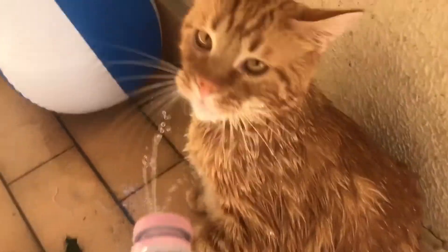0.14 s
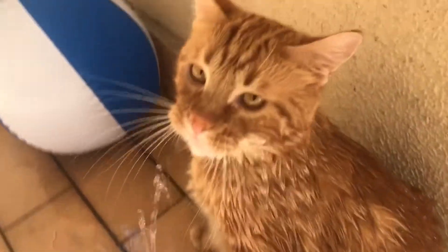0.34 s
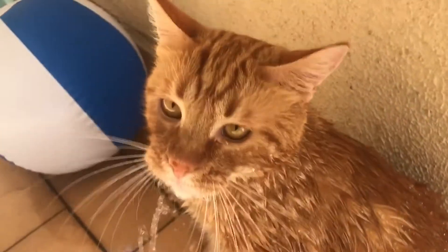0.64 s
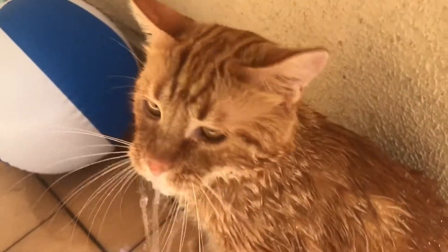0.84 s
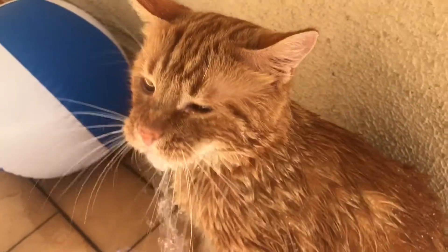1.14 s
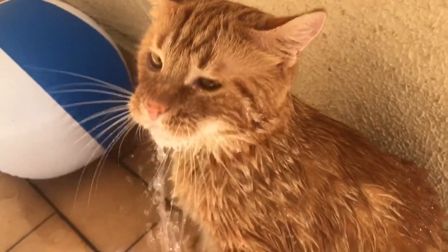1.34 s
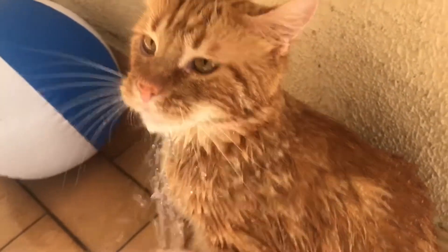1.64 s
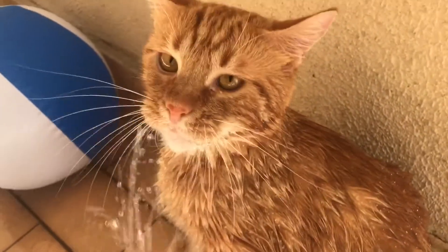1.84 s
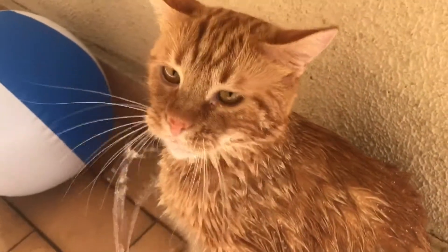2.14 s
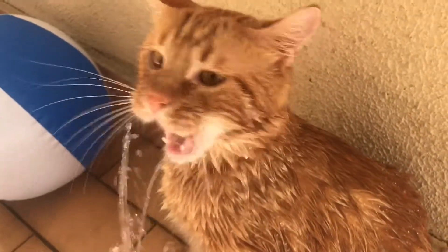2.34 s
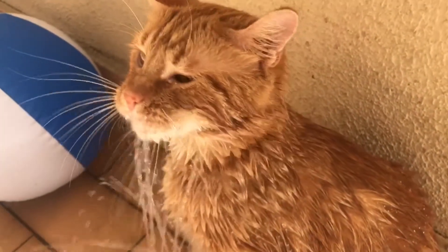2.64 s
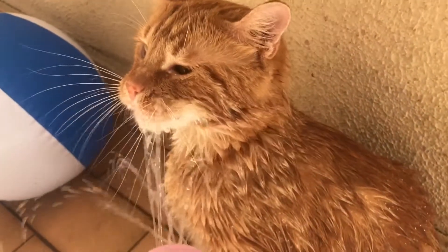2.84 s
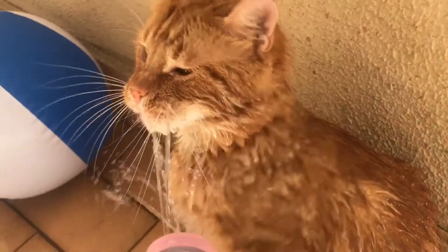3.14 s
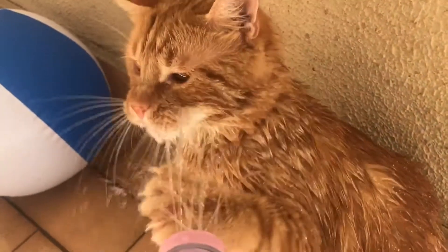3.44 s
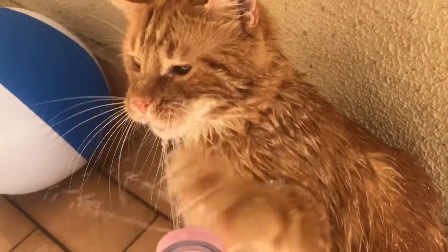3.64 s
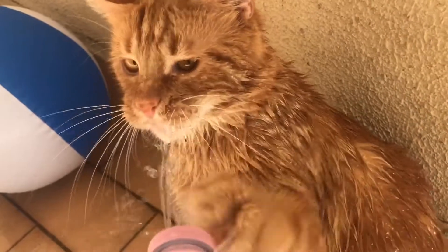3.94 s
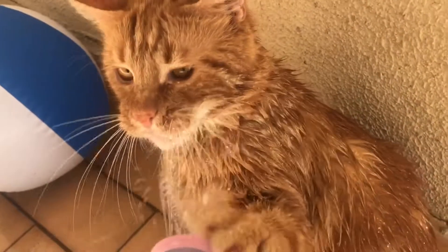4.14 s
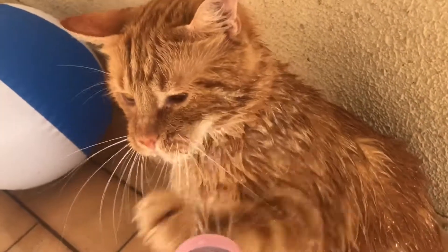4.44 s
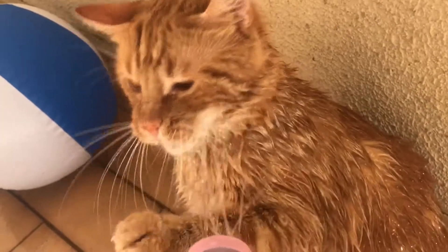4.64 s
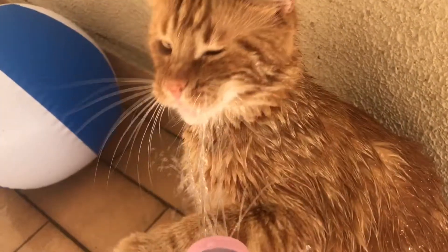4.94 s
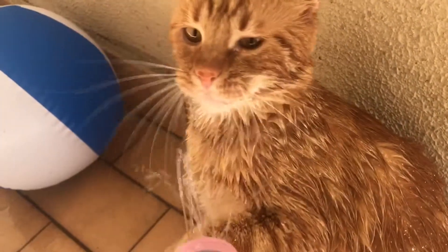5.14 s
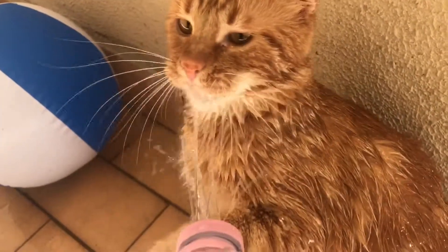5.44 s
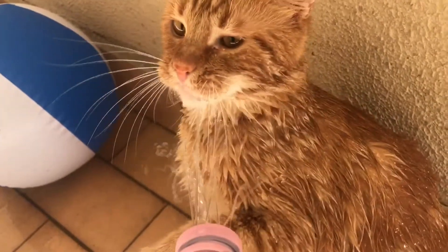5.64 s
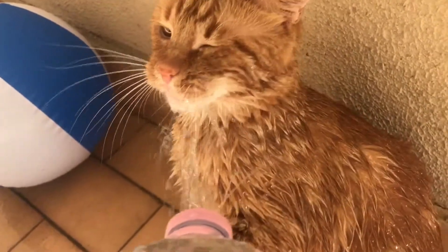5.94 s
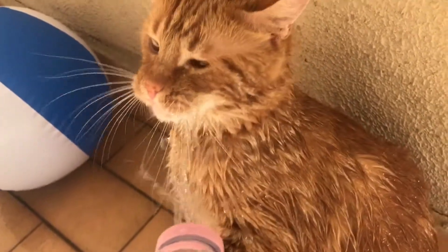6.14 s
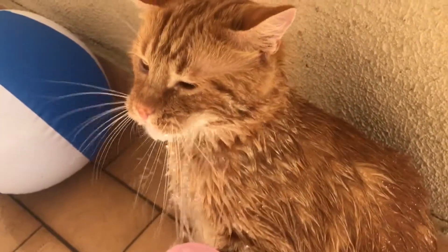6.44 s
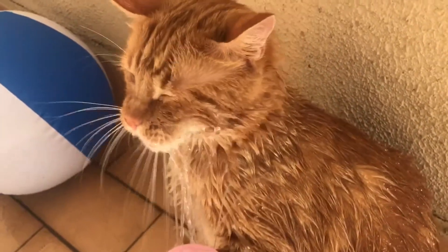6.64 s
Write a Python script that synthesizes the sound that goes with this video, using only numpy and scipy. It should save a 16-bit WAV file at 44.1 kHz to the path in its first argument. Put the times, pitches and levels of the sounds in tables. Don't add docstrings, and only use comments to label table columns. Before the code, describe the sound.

Close squeezed plastic bottle crackling and popping, the last pop loudest, with faint water hiss, droplet ticks and a short wall slap outdoors.

```python
import sys
import numpy as np
from scipy import signal
from scipy.fft import rfft, irfft, next_fast_len
from scipy.io import wavfile
from scipy.ndimage import uniform_filter1d, map_coordinates

SR = 44100
rng = np.random.default_rng(int(sys.argv[2]) if len(sys.argv) > 2 else 0)


def digitize_waveform(pressure):
    field = np.atleast_2d(pressure).T
    bounded = np.clip(field, -1, 1)
    quanta = np.round(bounded * 32767).astype(np.int16)
    wavfile.write(sys.argv[1], SR, quanta)


def boost(x):
    u = np.asarray(x, float) / 20
    return 10 ** u


N = 299880
FAINT_TOP_HZ = 15750


def unit(x):
    return x / np.sqrt(np.mean(x ** 2) + 1e-20)


def along(points, hz):
    f, v = np.transpose(points)
    return np.interp(np.log(hz + 1), np.log(f + 1), v)


def filtered(x, response):
    m = next_fast_len(len(x) + 8192)
    return irfft(rfft(x, m) * response(np.fft.rfftfreq(m, 1 / SR)), m)[:len(x)]


def resonances(modes):
    def response(f):
        total = 0
        for k, (hz, width, db) in enumerate(modes):
            total = total + (-1) ** k * boost(db) * 1j * f * width / (hz * hz - f * f + 1j * f * width)
        return total
    return response


def noise(response):
    return unit(filtered(rng.standard_normal(N), response))


def wobble(rate):
    knots = rng.standard_normal(int(N * rate / SR) + 4)
    return map_coordinates(knots, [np.arange(N) * rate / SR])


def swell(start, db, rise, hold, fall):
    t = np.arange(N) / SR - start - rise
    slope = np.minimum(t / rise, (hold - t) / fall)
    return boost(db + 20 * np.minimum(slope, 0).clip(-6))


def scattered(sound, response):
    click = filtered(signal.unit_impulse(len(sound), 100), response)
    return click * np.linalg.norm(sound) / np.linalg.norm(click)


def pops():
    starts = [
        2.8699,
        4.1462,
        4.6406,
        6.1967,
    ]
    # peak in dB, crack in dB, crack t60 at 1 kHz in seconds, echo in dB,
    # echo tilt in dB per octave, wait before a mode sounds in cycles.
    strengths = [
        (-15.3, -6.5, 0.036, -1, -3.7, .3),
        (-21, -12, .025, 0, -9.5, .9),
        (-7.5, -6, 0.028, -7.5, -0.6, .9),
        (-.5, -4, 0.021, -6.5, -0.5, .6),
    ]
    # frequency in Hz, width in Hz, level in dB.
    shells = [
        [(844, 106, -0.5), (1365, 85, -10.5), (2060, 75, -14), (2560, 150, -13), (2960, 130, -15),
         (3450, 190, -14), (3700, 230, -16), (4440, 200, -16)],
        [(340, 90, -3), (655, 46, 6.5), (900, 70, 7), (1040, 80, 5), (1240, 90, 1), (1950, 81, -1.5),
         (2230, 52, -3), (2500, 140, -5), (3440, 140, -11), (4000, 220, -12)],
        [(300, 150, 6), (835, 90, 0), (1080, 100, 0), (1390, 260, 7), (1890, 110, -6), (2070, 100, -9),
         (2640, 200, 1), (3370, 110, -5), (4350, 210, -15), (5210, 110, -15), (5470, 120, -14),
         (6480, 270, -12), (6760, 800, -2)],
        [(387, 90, -3.5), (525, 45, -2), (840, 290, -4), (1147, 210, -2), (1343, 95, 2), (1760, 80, 1.5),
         (2106, 100, -4), (2500, 250, -7), (3260, 130, -14), (4020, 170, -9), (5400, 400, -30),
         (6300, 300, -23), (7170, 200, -15), (8820, 250, -20)],
    ]
    # frequency in Hz, level in dB per Hz.
    colours = [
        [(120, -56), (200, -33), (892, 0), (1700, -12), (4450, -10.5), (15300, -63), (16500, -52)],
        [(120, -43), (200, -20), (997, 7), (3430, -18.5), (4530, -32), (14500, -52), (16500, -68)],
        [(59, -28.5), (100, -8), (324, -4), (620, -11), (1380, 2.5), (4880, -11.5), (6730, -12.5), (16500, -35)],
        [(60, -42), (130, -4), (1340, -6), (3650, -14.5), (4000, -12), (4900, -16), (10000, -20.5),
         (12000, -31), (16500, -42.5)],
    ]
    # frequency in Hz, width in Hz,
    # level in dB under the peak, t60 in seconds.
    bodies = [
        [(493, 1400, -23, 0.066), (1200, 1300, -29, 0.063), (900, 1200, -43, .2)],
        [(300, 350, -20, 0.07), (850, 500, -10, 0.065), (700, 1000, -32, .2)],
        [(320, 220, -25, 0.14), (1300, 1100, -27, 0.07), (700, 1100, -40, .3)],
        [(300, 600, -24, 0.11), (1300, 900, -30, .1), (1500, 2000, -48, .4)],
    ]
    crest_db = 12
    near, sent = np.zeros(N), np.zeros(N)
    t = np.arange(SR // 3) / SR
    for start, strength, shell, colour, body in zip(starts, strengths, shells, colours, bodies):
        db, crack_db, t60, echo_db, tilt_db, late = strength
        pop = boost(crack_db) * unit(crack(colour, t60, t)) + unit(shell_ring(shell, late, t))
        pop *= boost(db - crest_db) / np.sqrt(np.mean(pop[:SR // 100] ** 2))
        echo = scattered(pop, lambda f: boost(along(colour, f) + tilt_db * np.log2(f / 1000 + .01)))
        at = round(start * SR)
        near[at:][:len(t)] += pop + boost(db) * after_ring(body, t)
        sent[at:][:len(t)] += 0.21 * pop + boost(echo_db) * echo
    return np.array([near, sent])


def crack(colour, t60, t):
    hz, u, z = signal.stft(rng.standard_normal(len(t)), SR, nperseg=64, noverlap=56)
    lasts = t60 * (1000 / (hz[:, None] + 300)) ** .6
    fall_db = 60 * np.maximum(u - .0008, 0) / lasts
    dying = boost(along(colour, hz)[:, None] - fall_db) / np.sqrt(lasts)
    share = np.linalg.norm(dying, axis=1, keepdims=True) / np.linalg.norm(z * dying, axis=1, keepdims=True)
    burst = signal.istft(z * share * dying, SR, nperseg=64, noverlap=56)[1][:len(t)]
    return filtered(burst, lambda f: (1j * f / (1j * f + 1500)) ** 2)


def shell_ring(modes, late, t):
    ring = np.zeros(len(t))
    for k, (hz, width, db) in enumerate(modes):
        ring += (-1) ** k * boost(db) * mode(hz, width, np.maximum(t - late / hz, 0))
    return ring


def mode(hz, width, t):
    swell_cycles = .6
    rise = 1 - np.exp(-(t * hz / swell_cycles) ** 2)
    return width * np.sin(2 * np.pi * hz * t) * np.exp(-np.pi * width * t) * rise


def after_ring(body, t):
    ragged_db = 3
    out = np.zeros(len(t))
    for hz, width, db, t60 in body:
        wave = resonances([(hz, width, 0)])
        ringing = unit(filtered(rng.standard_normal(len(t)), lambda f: wave(f) ** 2))
        out += boost(db - 60 * t / t60 + ragged_db * wobble(160)[:len(t)]) * ringing
    return out * (1 - np.exp(-t / .003))


def snaps(rows, echo_db, sharpness):
    faint_db, first_slip = -42.5, 3
    out, t = np.zeros((2, N)), np.arange(SR // 20) / SR
    for start, db, hz, t60, broad_db in rows:
        burst = rng.standard_normal(len(t)) * boost(-60 * t / t60) * (1 - np.exp(-t / .0001))
        burst[3] += first_slip * np.sign(burst[3])
        top_hz = FAINT_TOP_HZ if db < faint_db else SR
        patch = resonances([(hz, hz / sharpness, 0)])
        around = resonances([(hz, 1.17 * hz, 0)])
        snap = filtered(burst, lambda f: (patch(f) + boost(broad_db) * around(f)) * around(f) * (f < top_hz))
        snap *= boost(db + 1) / np.max(np.abs(snap))
        spread = resonances([(min(.95 * hz, 11000), .45 * hz, 0)])
        echo = boost(echo_db) * scattered(snap, lambda f: spread(f) ** 2)
        out[:, round(start * SR):][:, :len(t)] += [snap, echo]
    return out


def alike(rows, t60, broad_db):
    return [(*row, t60, broad_db) for row in rows]


def creases():
    # start in seconds, peak in dB, colour in Hz, t60 in seconds, broad share in dB.
    folds = [(0.5776, -36.5, 10600, .006, -16), (1.0328, -22.5, 6930, .0092, 2),
             (1.6751, -39, 8700, .008, -15), (1.9071, -47, 6340, .0088, -8),
             (2.5206, -29.5, 6900, .013, -19), (2.8734, -41, 6500, .0037, -20),
             (3.7968, -51, 6700, .016, -22), (3.8182, -29, 6700, .016, -16), (3.8748, -50, 12500, .008, -4),
             (4.791, -57, 6200, .016, -21), (5.1277, -48.5, 7640, .011, -22),
             (5.5533, -45, 8300, .018, -22), (6.5989, -44, 7980, .0098, -12)]
    return snaps(folds, echo_db=7, sharpness=8)


def clicks():
    # start in seconds, peak in dB, colour in Hz.
    crumples = [
        (2.878, -48, 13000),
        (3.0012, -33, 7600),
        (3.6082, -48, 11500),
        (3.6296, -54, 4740),
        (4.0415, -40, 8000),
        (4.1364, -44, 6200),
        (4.1604, -41, 14600),
        (4.1752, -39, 11000),
        (4.3215, -32, 11400),
        (5.3433, -54, 5700),
    ]
    return snaps(alike(crumples, t60=.01, broad_db=5), echo_db=2, sharpness=8)


def settling():
    # start in seconds, peak in dB, colour in Hz.
    ticks = [(0.051, -55, 10800), (0.9554, -63, 4620), (1.178, -56, 7150), (2.8904, -48, 4580),
             (2.9934, -40, 4900), (3.982, -52, 12000), (4.0113, -50, 12000), (2.5825, -51, 9500),
             (4.1755, -52, 5000), (4.196, -55, 4500), (4.2825, -55, 3600), (4.393, -53, 11000),
             (6.411, -52, 4500), (6.411, -46, 7700), (4.6455, -37, 5500), (4.6455, -36, 3400),
             (.157, -58, 10500), (.222, -58, 12000), (.291, -56, 9500), (2.322, -58, 11000),
             (4.0244, -50, 4600), (4.1449, -39, 6700), (4.1814, -51, 9360), (4.2228, -50.5, 8540),
             (4.2826, -36.5, 10350), (5.1098, -52, 13600), (5.893, -53, 6300), (5.9075, -48, 5900),
             (6.0621, -57, 5540), (6.1235, -51.5, 8400), (6.1479, -49, 6900), (6.4394, -52, 5780),
             (6.5176, -48, 8830)]
    return snaps(alike(ticks, t60=.008, broad_db=-9), echo_db=-2, sharpness=8)


def drops():
    # start in seconds, peak in dB, colour in Hz.
    hits = [(0.024, -50, 14000), (0.326, -58, 14000), (0.3381, -50, 15300), (0.3696, -53, 12500),
            (0.478, -54, 15000), (0.5406, -54, 14500), (1.2935, -52, 12600), (1.3548, -39, 14000),
            (1.6207, -45.5, 14200), (1.6447, -36, 14800), (2.0353, -42, 11000), (2.2358, -46, 14800),
            (2.573, -52, 12500), (2.592, -52, 13000), (3.87, -53, 13500), (2.9761, -47, 13300),
            (3.0235, -42.6, 14800), (3.1602, -47.5, 11500), (3.18, -48, 12500), (3.5264, -54, 11800),
            (4.3264, -46, 15000), (4.711, -47, 14000), (4.7666, -50, 14000), (5.228, -46.5, 13500),
            (5.244, -53, 13500), (5.338, -52, 15300), (5.375, -55, 12500), (2.738, -55, 14000),
            (3.154, -54, 15000), (3.298, -56, 13500), (5.4228, -42, 12900), (5.6341, -39.5, 13800),
            (5.8247, -33, 14600), (5.918, -49, 13000), (5.9554, -51.5, 14400), (6.411, -28, 13000),
            (6.4687, -51, 11260), (6.745, -53, 11500), (6.6822, -43.5, 14600)]
    return snaps(alike(hits, t60=.008, broad_db=-16), echo_db=-3, sharpness=7)


def squeaks():
    # start in seconds, peak in dB, colour in Hz.
    slips = [(2.55, -54, 2150), (2.5635, -54, 2000), (4.1645, -54, 2800), (3.9895, -55, 4350),
             (3.9973, -50, 4400), (4.0113, -46, 4350), (4.0312, -48, 4500), (4.0417, -43.5, 2970),
             (4.2228, -56, 2680), (4.235, -56, 2410), (4.2464, -54, 2630), (4.373, -55, 2140),
             (6.673, -54.5, 3300)]
    return snaps(alike(slips, t60=.023, broad_db=-29), echo_db=-2, sharpness=15)


def knocks():
    # start in seconds, peak in dB, colour in Hz, broad share in dB.
    touches = [(0.291, -52, 2420, -8), (4.013, -52, 1160, 0), (4.0235, -48, 1850, -10),
               (4.028, -48, 895, -6), (4.0322, -45, 1000, 4), (4.043, -35, 1300, -14),
               (4.044, -40, 300, -12), (4.051, -41, 1250, -14), (4.056, -43, 300, -4),
               (4.1452, -42, 2600, 3), (4.6272, -36, 1150, -10), (4.6295, -37, 330, -8),
               (4.514, -53, 900, 5), (4.6268, -41, 2500, -2), (5.8249, -45, 1500, 12),
               (6.6686, -42, 1110, -7.5)]
    rows = [(start, db, hz, .018, broad_db) for start, db, hz, broad_db in touches]
    return snaps(rows, echo_db=0.1, sharpness=5)


def drag():
    # peak in seconds, thud in dB, rustle in dB, then the times in seconds to rise and to fall 20 dB.
    clumps = [
        (4.002, -60, -68, .04, .04),
        (4.046, -39, -53, .06, .018),
        (4.162, -42, -57, .004, .03),
        (4.246, -53, -59, .06, .04),
        (4.3, -71, -66, .03, .2),
    ]
    # frequency in Hz, width in Hz, level in dB.
    thud_modes = [(288, 330, 3.5), (1310, 360, -5)]
    rustle_modes = [(2900, 760, 4.5), (4450, 450, 0.5), (8500, 2500, -4), (13000, 4000, -7)]
    thud = unit(boost(3.5 * wobble(80)) * noise(resonances(thud_modes)))
    rustle = unit(boost(6.5 * wobble(180)) * noise(resonances(rustle_modes)))
    out = np.zeros(N)
    for peak, thud_db, rustle_db, rise, fall in clumps:
        clump = boost(thud_db - 7) * thud + boost(rustle_db - 6.5) * rustle
        out += swell(peak - rise, 0, rise, 0, fall) * clump
    return out


def spit():
    # frequency in Hz, level in dB per Hz.
    cap = [(350, -40), (600, -8.5), (736, 1.5), (929, -7.5), (1090, -19), (1270, -6), (1810, -14),
           (2200, -1), (2650, -7), (3100, -3), (3850, -3), (4550, -6), (4950, -9), (5870, -2.5),
           (7720, -13), (13300, -16.5), (15700, -23)]
    gain = swell(start=4.932, db=-50.5, rise=.003, hold=.04, fall=.18)
    return gain * boost(1.2 * wobble(90)) * noise(lambda f: boost(along(cap, f)))


def jet():
    fur = [(400, 4), (2500, -6), (5000, -5), (9000, -4), (14000, -3.5)]  # Hz, dB per Hz
    gain = swell(start=6.28, db=-62.5, rise=.14, hold=.17, fall=.015)
    return gain * boost(2.3 * wobble(150)) * noise(lambda f: boost(along(fur, f)))


def spray():
    # time in seconds, level in dB.
    squeeze = [(0.0, -75), (0.3, -84), (1.02, -90), (1.32, -74), (2.36, -82), (2.52, -67), (3.1, -68.5),
               (3.4, -79), (4.0, -74), (4.18, -65), (4.45, -74), (4.75, -70), (4.95, -80), (5.24, -74),
               (5.9, -84), (6.21, -72), (6.48, -68), (6.8, -85)]
    # frequency in Hz, level in dB per Hz.
    hiss = [(5000, -13), (7500, -12), (10000, -5), (12000, 1.5), (14000, 2), (15700, -6.5)]
    times, levels_db = np.transpose(squeeze)
    gain = boost(np.interp(np.arange(N) / SR, times, levels_db, left=-120, right=-120))
    hits = (rng.random(N) < 60 / SR) * rng.exponential(size=N).clip(0, 2.8)
    droplets = 1 + boost(-1) * uniform_filter1d(hits, size=60) * 60
    flutter = boost(-4.5 + 1.6 * wobble(63) + .7 * wobble(9))
    return gain * flutter * droplets * noise(lambda f: boost(along(hiss, f)))


def patio(x, tail_db):
    # frequency in Hz, t60 in seconds.
    decay = [(200, 0.72), (1000, 0.36), (5000, 0.55), (12000, 0.36)]
    # delay in seconds, smear in seconds, level in dB.
    slaps = [
        (.005, 0.003, -22),
        (0.0242, 0.0039, -18),
        (.052, .005, -29),
    ]
    out, hop, t = np.zeros(N + SR), SR // 10, np.arange(SR // 3) / SR
    padded = np.pad(x, (0, hop))
    for at in range(0, N, hop):
        hz, u, z = signal.stft(rng.standard_normal(len(t)), SR, nperseg=256)
        dying = boost(-60 * u / along(decay, hz)[:, None])
        tail = signal.istft(z * dying, SR, nperseg=256)[1][:len(t)]
        builds = 1 - np.exp(-(t / 0.017) ** 3)
        answer = boost(tail_db) * tail / np.linalg.norm(tail) * builds
        for delay, smear, db in slaps:
            slap = rng.standard_normal(len(t)) * np.exp(-.5 * ((t - delay) / smear) ** 2)
            answer += boost(db) * slap / np.linalg.norm(slap)
        out[at:at + hop + len(t) - 1] += signal.fftconvolve(padded[at:at + hop], answer)
    return out[:N]


def rumble():
    # frequency in Hz, level in dB per Hz.
    traffic = [(15, -56), (25, -21), (45, -3.5), (70, 3), (146, 0), (167, -9.5), (195, -9), (399, -12),
               (429, -29), (450, -14), (580, -64), (990, -120)]
    shake_db = 3 * np.exp(-((np.arange(N) / SR - 4.1) / .2) ** 2)
    return boost(-54.8 + shake_db + 0.6 * wobble(2.6)) * noise(lambda f: boost(along(traffic, f)))


def open_air():
    # frequency in Hz, level in dB per Hz.
    breath = [(240, -37.5), (400, -13), (504, -8.5), (636, -4.5), (697, -8.5), (789, -7.5), (1230, -12),
              (1310, -13), (1650, -16.5), (4580, -20.5), (6540, -25.5), (11000, -30.5), (16000, -26)]
    drift_db = -.25 * np.arange(N) / SR
    return boost(-62.8 + drift_db + .5 * wobble(8)) * noise(lambda f: boost(along(breath, f)))


def machine_hum():
    # frequency in Hz, width in Hz, rms level in dB.
    bands = [(193, 11, -66), (586.6, 12, -77.5), (630, 30, -75.5)]
    return sum(boost(db) * noise(resonances([(hz, width, 0)])) for hz, width, db in bands)


def scene():
    near, sent = pops() + creases() + clicks() + settling() + drops() + squeaks() + knocks()
    steady = patio(sent, tail_db=-19.5) + drag() + spit() + jet() + spray()
    steady += rumble() + open_air() + machine_hum()
    return (near + filtered(steady, lambda f: f < FAINT_TOP_HZ))[None]


def low_pass(x):
    return signal.sosfilt(signal.butter(12, 17040, fs=SR, output="sos"), x)


def record(dry):
    # frequency in Hz, level in dB.
    port = [(9800, 0.5), (10500, -2.5), (11200, 0.5), (16450, -1.5), (17150, -59.5)]
    held = dry[0] / (1 + np.abs(dry[0] / .93) ** 8) ** (1 / 8)
    heard = filtered(held, lambda f: boost(along(port, f)))
    return low_pass(heard[None])


dry = scene()
out = record(dry)
digitize_waveform(out)
```